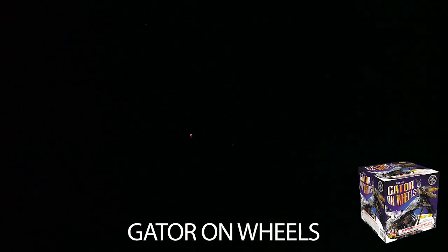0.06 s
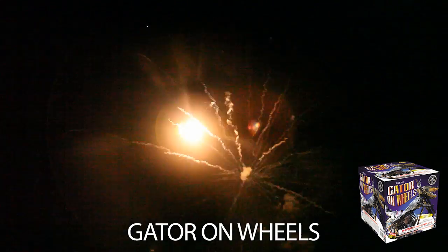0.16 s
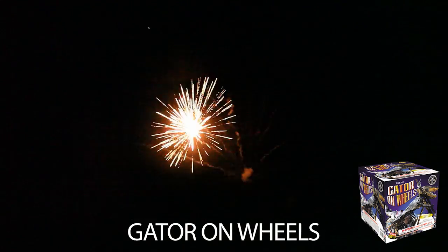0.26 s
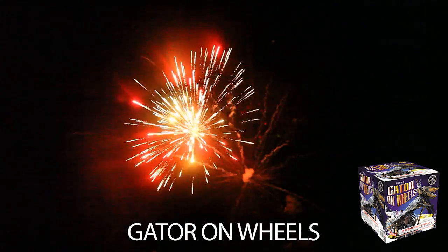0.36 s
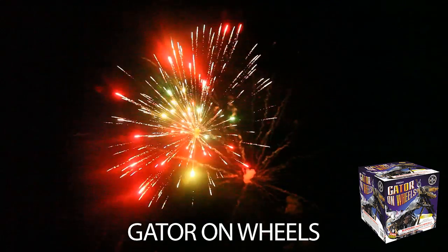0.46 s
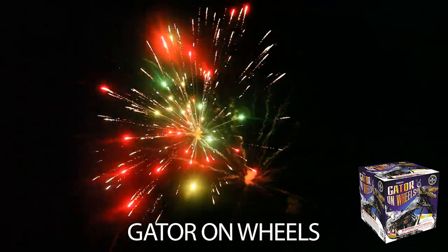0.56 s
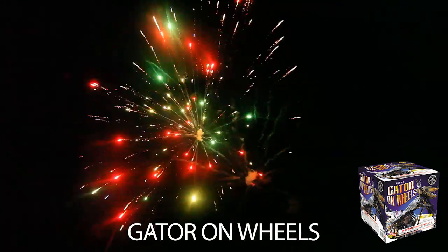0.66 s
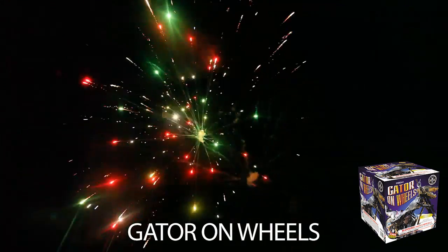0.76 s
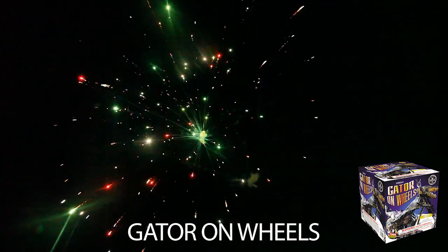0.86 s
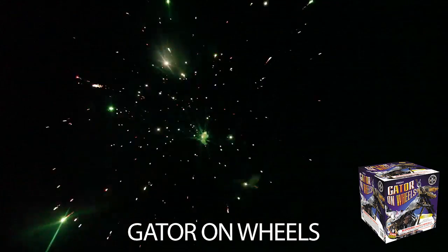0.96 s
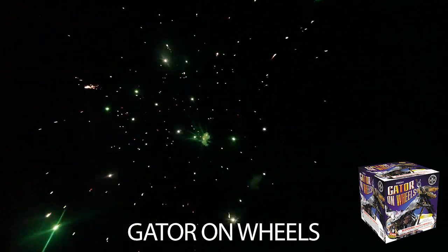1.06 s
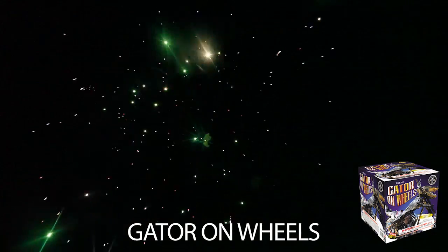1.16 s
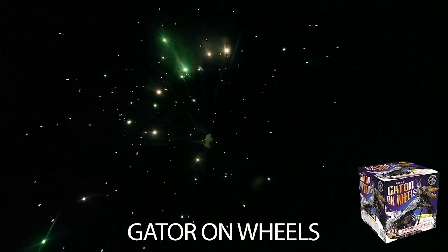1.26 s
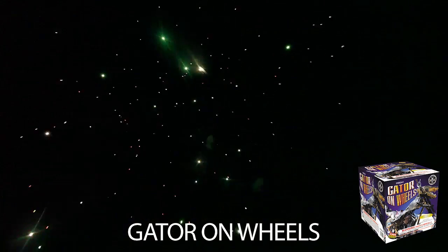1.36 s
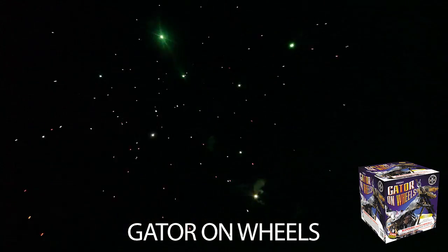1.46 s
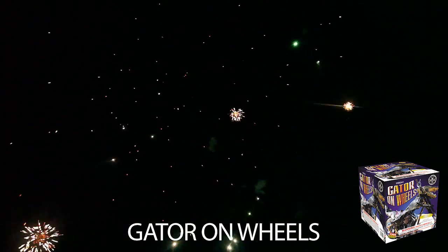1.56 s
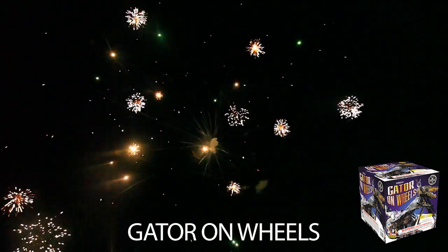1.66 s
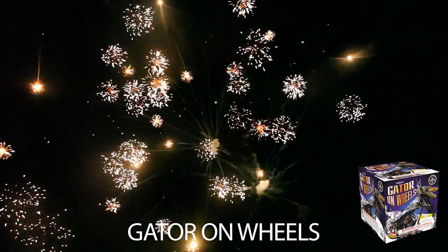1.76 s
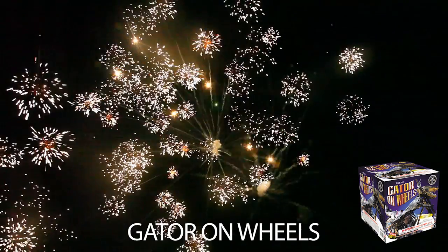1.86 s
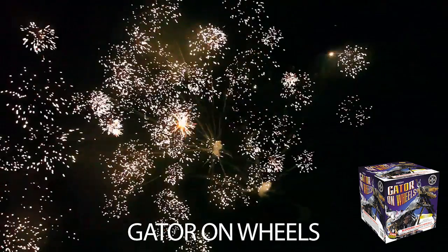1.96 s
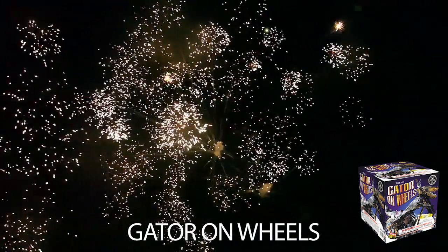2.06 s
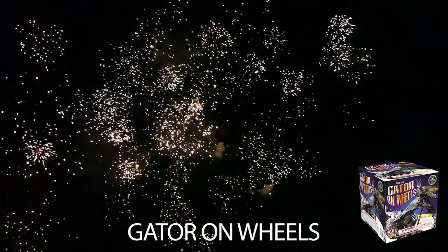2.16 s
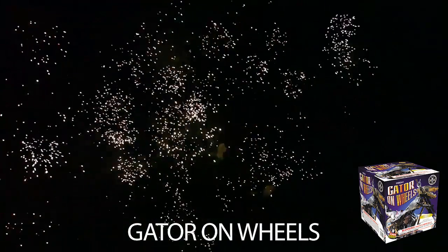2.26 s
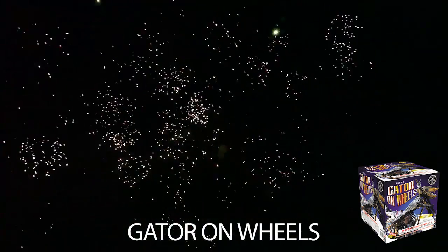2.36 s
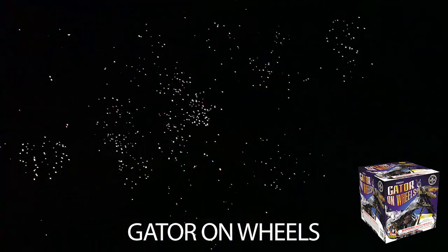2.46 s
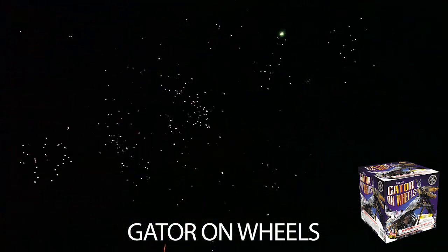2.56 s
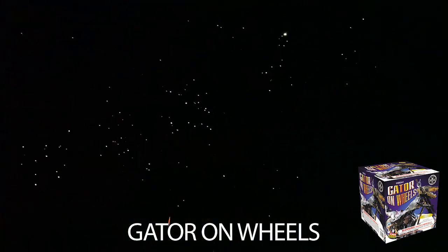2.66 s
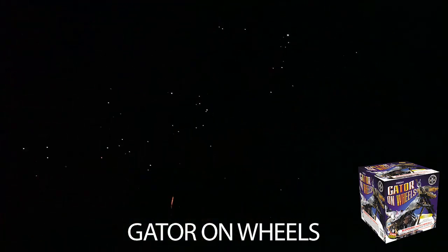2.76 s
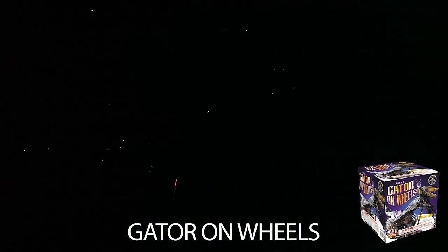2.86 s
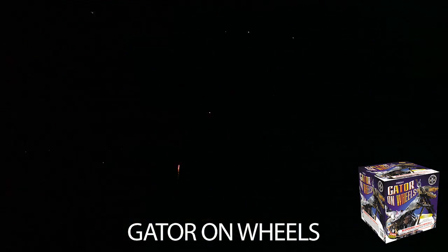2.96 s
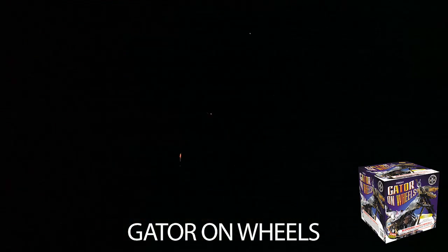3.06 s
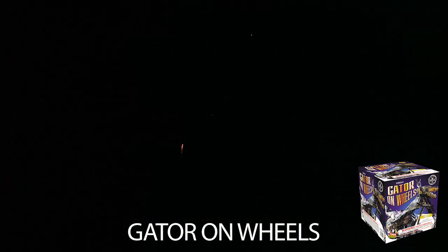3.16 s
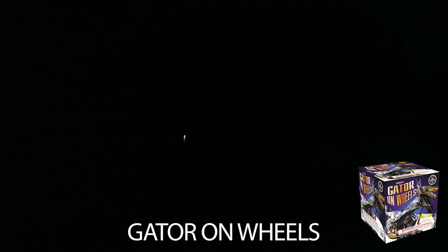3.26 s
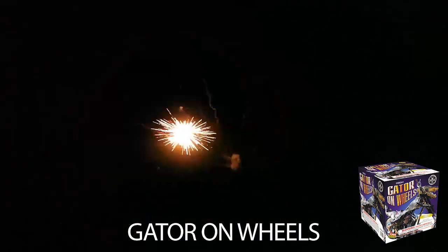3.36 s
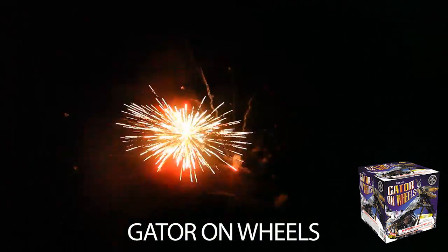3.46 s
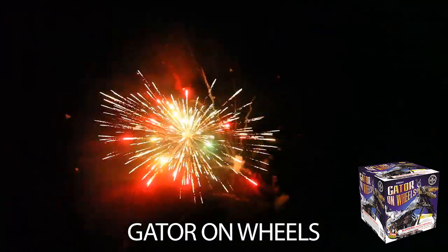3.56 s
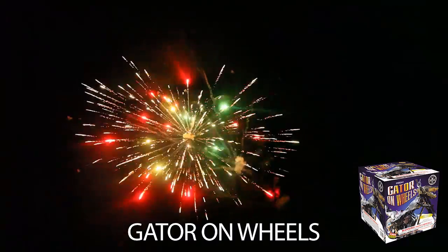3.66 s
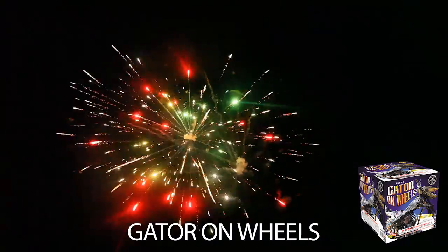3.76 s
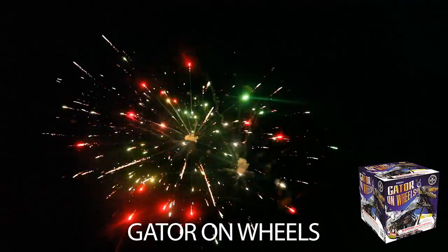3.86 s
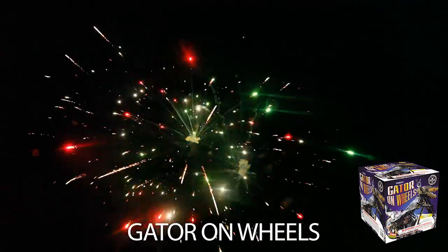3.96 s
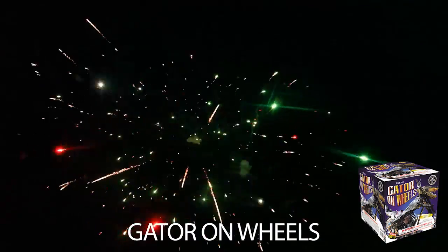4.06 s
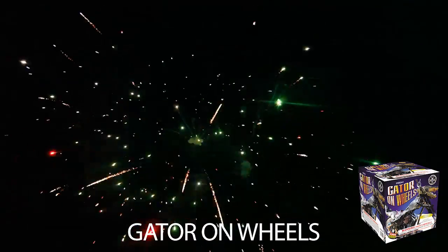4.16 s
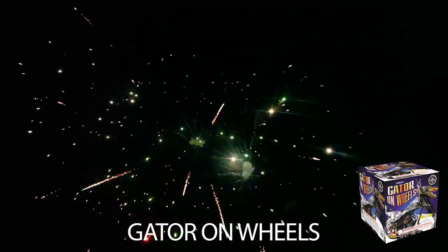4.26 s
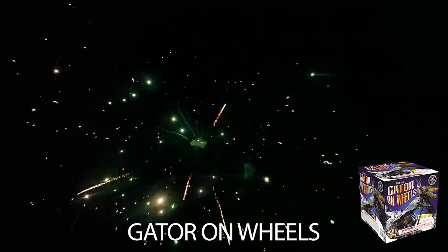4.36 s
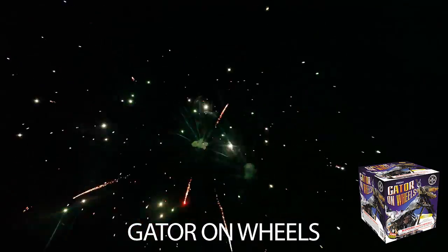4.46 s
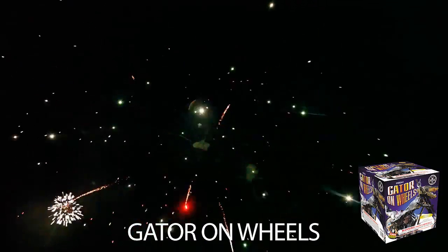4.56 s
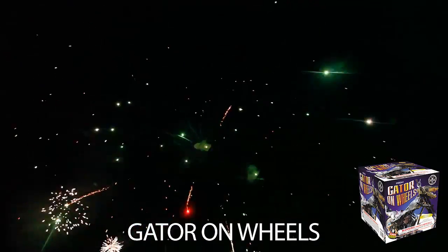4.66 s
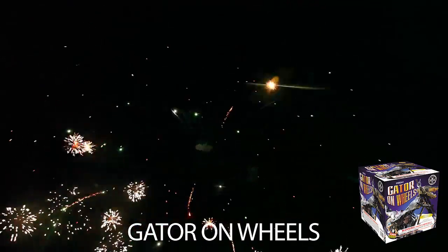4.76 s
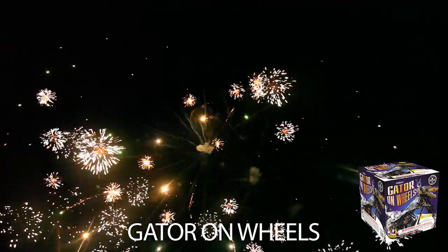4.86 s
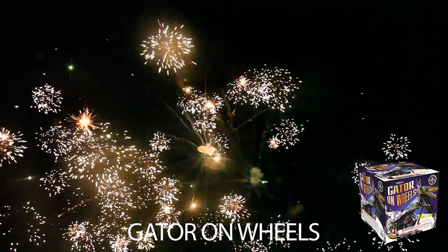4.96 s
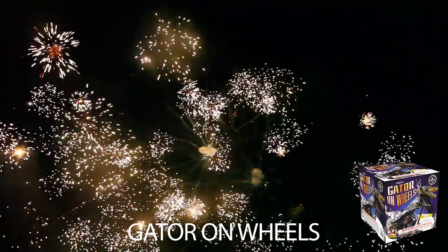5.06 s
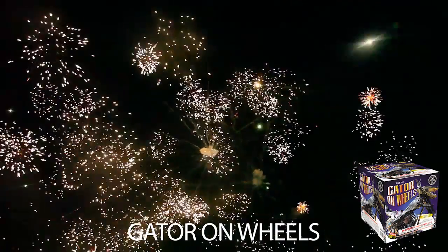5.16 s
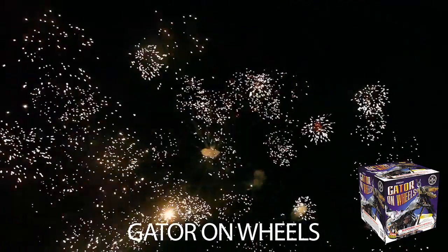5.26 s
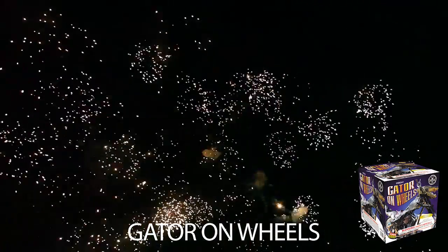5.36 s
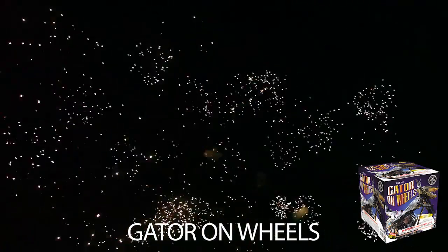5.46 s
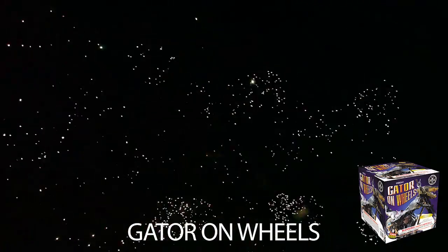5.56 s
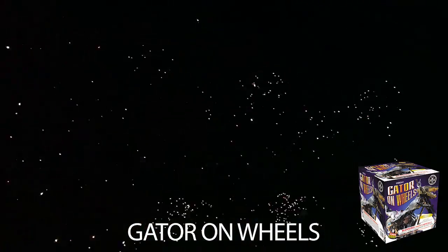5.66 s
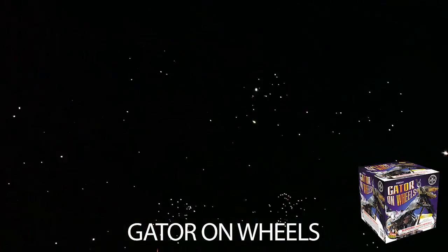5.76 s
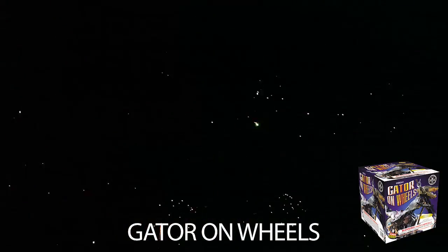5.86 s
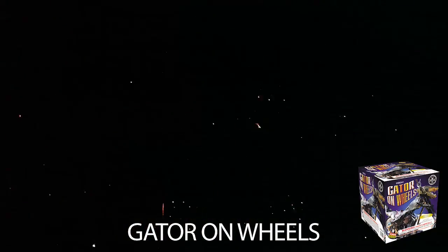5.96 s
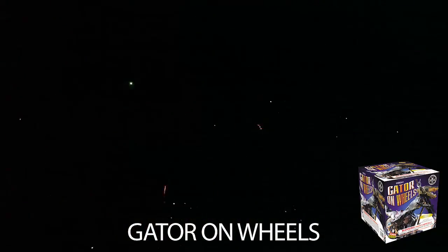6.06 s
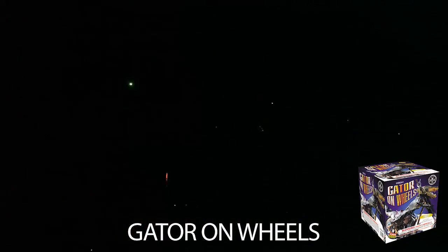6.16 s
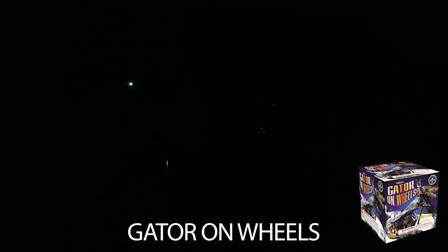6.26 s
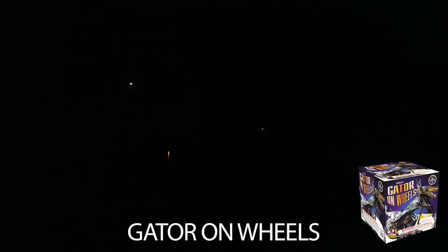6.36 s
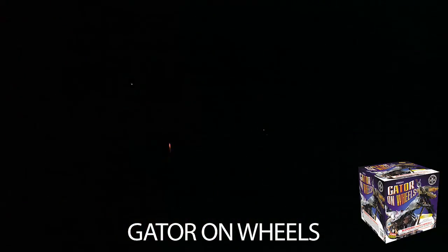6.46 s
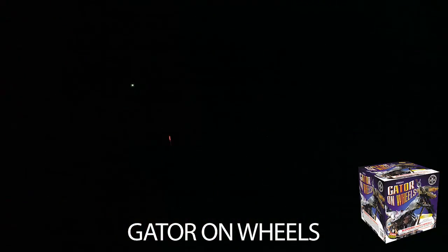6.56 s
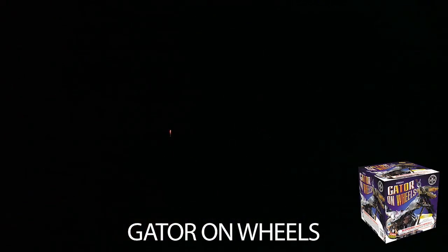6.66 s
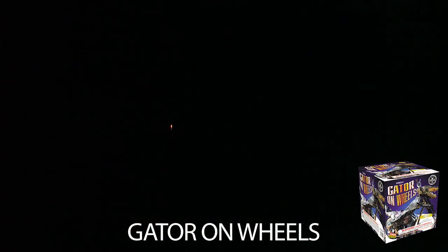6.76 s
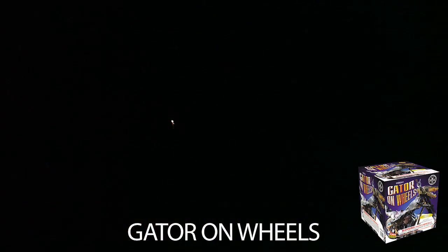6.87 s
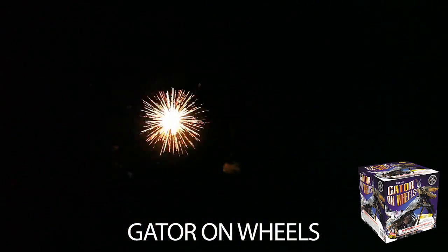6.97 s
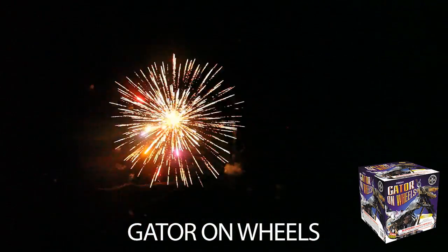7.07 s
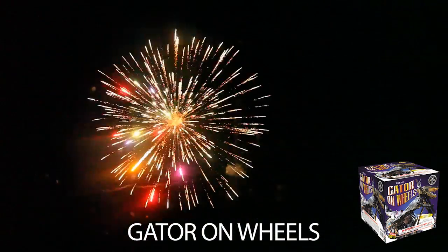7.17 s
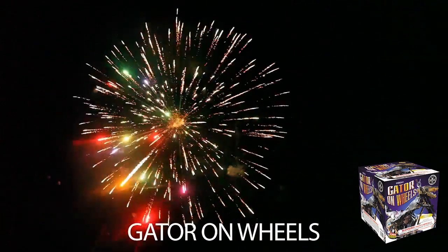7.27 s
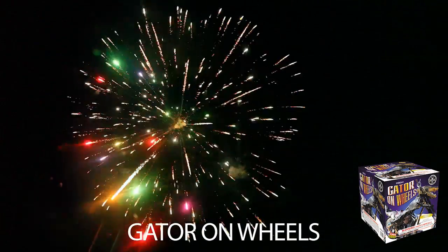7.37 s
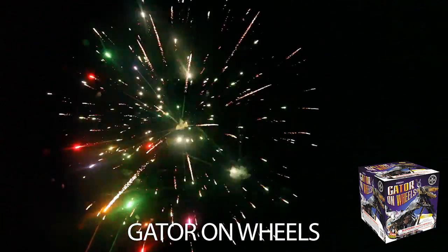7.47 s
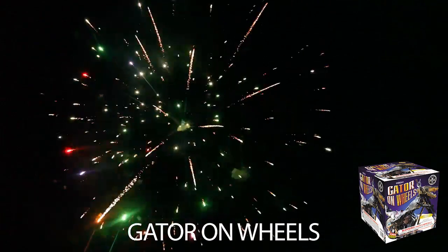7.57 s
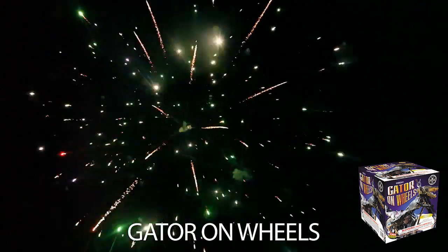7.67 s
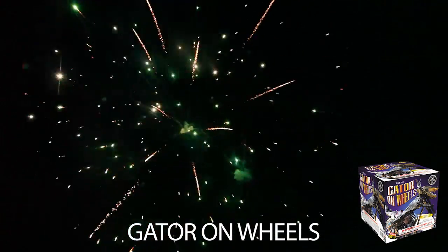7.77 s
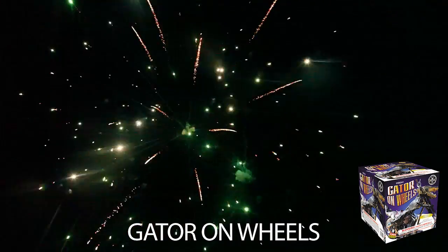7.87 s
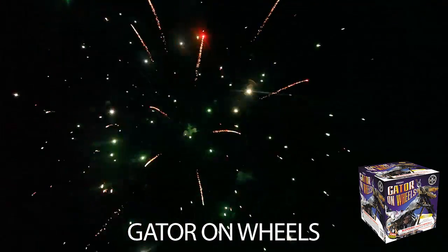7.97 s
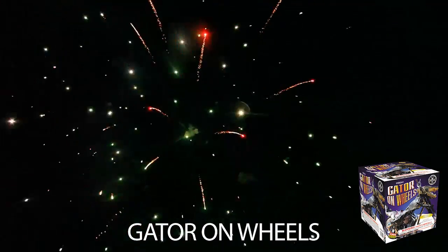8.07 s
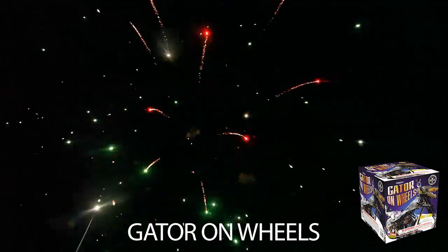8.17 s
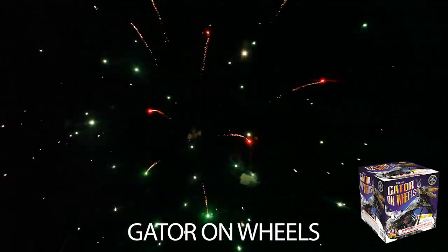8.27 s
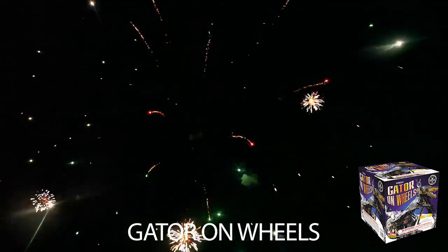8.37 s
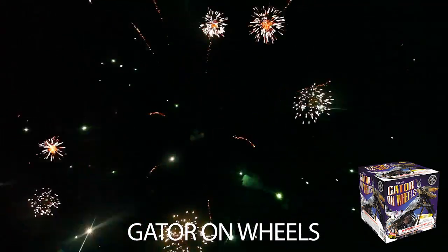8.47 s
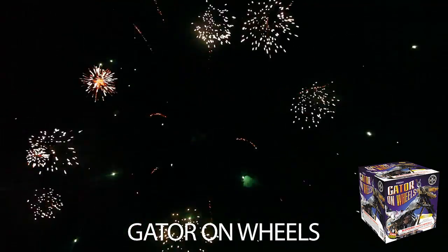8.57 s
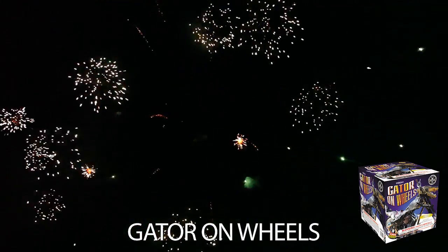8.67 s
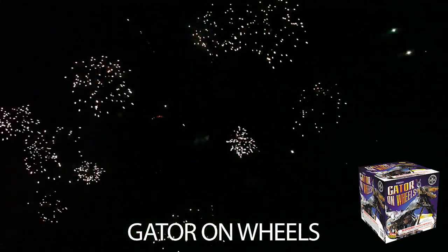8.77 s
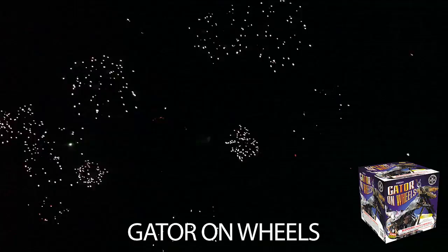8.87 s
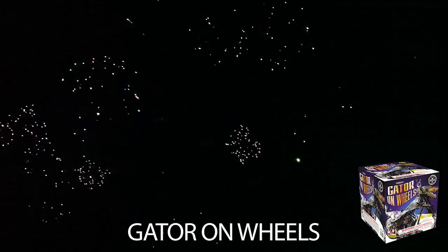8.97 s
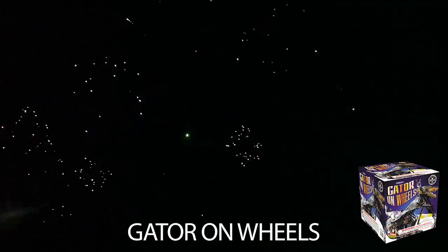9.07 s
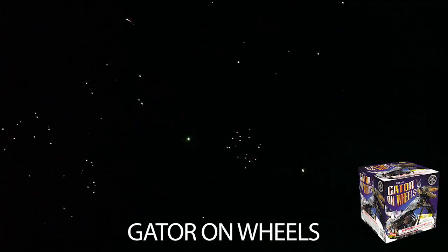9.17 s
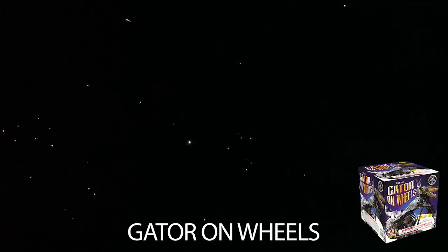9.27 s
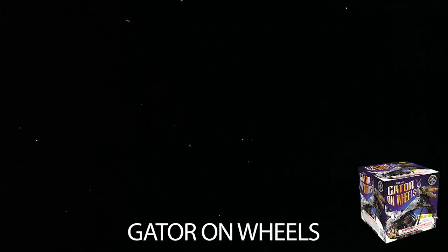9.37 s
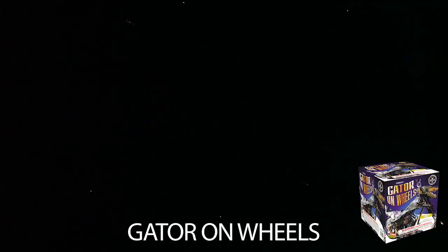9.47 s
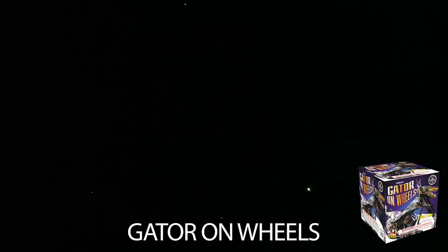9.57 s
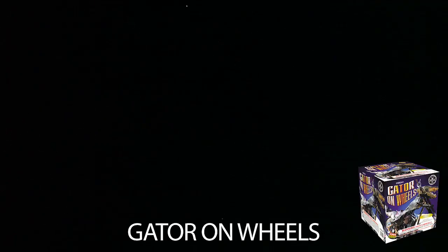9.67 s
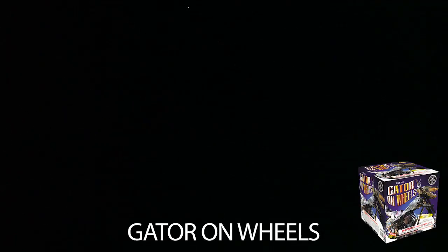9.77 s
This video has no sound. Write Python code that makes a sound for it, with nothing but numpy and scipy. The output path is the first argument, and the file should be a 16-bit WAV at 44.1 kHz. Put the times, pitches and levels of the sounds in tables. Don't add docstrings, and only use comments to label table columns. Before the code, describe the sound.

A hard, distorted firework bang cracks overhead, its ground bounce and low rumble fading into hushed night air with soft wind. Then tiny explosive snaps scatter and thicken into crackle, thinning to faint distant puffs, with a thud from the launch tube. The cycle repeats twice, the third crackle sparser, ending on a loud thump. The microphone clips, its gain ducks and slowly recovers.

```python
import sys
import numpy as np
from scipy import signal
from scipy.io import wavfile

SR = 44100
rng = np.random.default_rng(int(sys.argv[2]) if len(sys.argv) > 2 else 0)


def dump(signal):
    limited = np.clip(np.atleast_2d(signal).T, -1, 1)
    pcm = np.round(limited * 32767).astype(np.int16)
    wavfile.write(sys.argv[1], SR, pcm)


def ratio(d):
    e = np.asarray(d, float) / 20
    return 10 ** e


N = 433499

# t/s, ceiling level/dB, ring f/Hz, ground bounce delay/ms
SHELL_BURSTS = [
    (.3571, .6, 400, 5.45),
    (3.5026, .6, 415, 5.5),
    (7.1087, .6, 398, 5.8),
]
# t/s, ceiling level/dB, ring f/Hz, ground bounce delay/ms
LIFT_THUMPS = [
    (2.2720, -6.8, 330, 8.4),
    (5.4412, -6.5, 310, 8.5),
    (9.4866, -.1, 310, 8.5),
]
# f/Hz, level/dB per Hz, time to fall 60 dB/s
SHELL_ROLL = [(60, -7.5, 0.11), (190, -0.5, 0.23), (400, 4, 0.17), (815, -10.5, 0.18), (2000, -16, 0.14),
              (5500, -27, .12), (8900, -38.5, 0.033), (15000, -38, 0.083)]
LIFT_ROLL = [(60.23, -7.5, 0.099), (190, 0, 0.14), (374, -5.5, 0.21), (785, 3, 0.041), (2070, -14, 0.043),
             (5350, -21, 0.055), (8900, -42, 0.036), (14200, -63, 0.033)]
# f/Hz, level/dB per Hz, time to fall 60 dB/s
SHELL_LATE = [(60, -16.5, 0.28), (188, -3, 1.7), (370, 3, 0.83), (610, -4.5, 0.72), (3800, -21.5, 1.4),
              (5500, -21.5, .8), (7200, -30.5, 0.87), (15000, -42, 0.18)]
LIFT_LATE = [(60, -16.5, 0.44), (202, -3.5, 0.27), (354, -1, 1.1), (516.5, -23, 0.8), (899, -16.5, .5),
             (1930, -24, 0.32), (5430, -34.5, 0.77), (14700, -63, .2)]

# t/s, strength level/dB over full scale, ground bounce delay/ms, push width/ms
EARLY_STARS = [(1.6693, 4.6, 3.7, .125), (1.7702, 9, 3.4, .1), (1.7975, -4, 5.7, .11),
               (1.8032, -.4, 6, .13), (1.811, -2.3, 3.8, .115), (1.8148, -4.2, 4, .13),
               (1.8352, -9.3, 5.9, .115), (1.8411, -4.9, 5.1, .115), (1.8799, -6.2, 4.9, .115),
               (2.2862, -8, 5, .12), (2.3353, -7.2, 4.8, .125), (2.3771, -7.1, 5, .125),
               (4.5993, 3.2, 3.4, .13), (4.6832, -.5, 4.1, .115), (4.8282, 6.5, 3.5, .105),
               (4.8772, 6.5, 3.2, .13), (4.9129, -3.9, 5.7, .135), (4.9295, -5.8, 4.9, .115),
               (4.9791, -7.6, 3.5, .115), (5.3017, -6.6, 4, .115), (5.4125, -8.2, 4, .115),
               (5.4618, -6, 4.3, .13), (5.5323, -8.3, 3.6, .115), (5.6579, -4.9, 4.3, .125)]
LAST_STARS = [(8.4633, 5.5, 4, .15), (8.4815, -18, 1.5, .15), (8.5147, 0, 5.4, .15),
              (8.5336, -5.2, 4.1, .11), (8.5441, -2.8, 6.1, .15), (8.5851, -3.7, 6.5, .125),
              (8.5976, -5.9, 6.8, .115), (8.6044, -5.6, 4.7, .115), (8.6681, -6, 5.6, .135),
              (8.7604, -6.4, 5, .115), (8.7993, -6.6, 4.7, .115), (8.8579, -6.4, 5.5, .115),
              (8.8763, -6.3, 5.9, .16), (8.9169, -6.1, 4.6, .115)]
# first t/s, last t/s, number of stars
FIRST_FLURRIES = [(1.8564, 1.8627, 2), (1.8875, 1.893, 5), (1.8998, 1.9041, 4), (1.9093, 1.9159, 4),
                  (1.9238, 1.9278, 2), (1.9357, 1.9383, 3), (1.943, 1.9495, 2), (1.9542, 1.9623, 5),
                  (1.9763, 1.9851, 3), (1.9888, 1.9956, 4), (2.0042, 2.0158, 2), (2.0189, 2.0355, 2),
                  (2.0418, 2.0534, 2), (2.0597, 2.0686, 6), (2.0758, 2.0838, 2), (2.0983, 2.1091, 2),
                  (2.1162, 2.135, 7), (2.1785, 2.1827, 2), (2.2023, 2.2101, 2), (2.2595, 2.2668, 2),
                  (2.315, 2.3168, 2)]
SECOND_FLURRIES = [(4.939, 4.9421, 2), (4.9547, 4.9662, 2), (4.9948, 5.0032, 2), (5.0059, 5.0088, 2),
                   (5.0166, 5.0213, 4), (5.0286, 5.0305, 2), (5.0447, 5.0478, 3), (5.0529, 5.0605, 3),
                   (5.0656, 5.0725, 5), (5.0765, 5.0802, 3), (5.087, 5.095, 3), (5.1127, 5.1185, 3),
                   (5.15, 5.1631, 5), (5.1676, 5.1751, 4), (5.1819, 5.1977, 4), (5.2076, 5.2192, 2),
                   (5.2315, 5.2438, 5), (5.2537, 5.2577, 2), (5.2794, 5.2867, 2), (5.3227, 5.3312, 3),
                   (5.3707, 5.3741, 2)]
# f/Hz, level/dB per Hz, time to fall 60 dB/s
POP_SCATTER = [(147, 9.5, 0.068), (674, -7, 0.12), (1473, -4, 0.082), (3500, -21, 0.058),
               (5430, -12.5, 0.1), (6730, -8.5, 0.042), (9100, -37, .03), (14900, -52, .02)]
# t/s, peak level/dB
FAR_POPS = [(2.564, -43), (2.638, -43), (2.737, -53.5), (2.831, -45), (2.855, -50), (2.88, -48),
            (2.906, -44), (2.961, -46.5), (3.008, -53), (5.795, -43.5), (5.857, -55), (5.927, -49),
            (5.971, -48), (6.03, -67), (6.153, -62), (6.213, -64), (9.059, -45), (9.194, -45),
            (9.241, -44.5), (9.32, -45)]

# t/s, level/dB
GUSTS = [(0.0, -70), (0.19, -60.5), (0.41, -60.5), (0.85, -65), (2.14, -57), (2.35, -69), (3.17, -65.5),
         (3.56, -56.5), (4.02, -68.5), (5.06, -57), (5.83, -71), (6.95, -59.5), (7.09, -55.5),
         (7.58, -71.5), (8.51, -57.5), (8.93, -72), (9.58, -63), (9.83, -71)]
# f/Hz, level/dB per Hz
WIND = [(20, -1), (50, 4), (90, -6), (160, -15.5), (300, -51)]
RUMBLE = [(50, -32.5), (90, -4.5), (170, 2), (330, -5.5), (480, -13), (700, -32.5)]
TREES = [(400, -16.5), (620, -8), (900, -0.2), (1250, -13), (1800, -34.5)]
HISS = [(700, -16), (1400, 0.5), (2500, -2.5), (4000, -7), (5500, -17), (6800, -19), (9000, -32.5),
        (16500, -40)]
NIGHT = [(100, 3), (400, -0.5), (2000, -3.5), (4500, -6), (6500, -17.5), (10000, -15.5), (16000, -19)]
# rest level/dB, level after a shell/dB, its fading/(dB/s),
# level after a star/dB, its fading/(dB/s)
RETURNS = [
    (-75, -46, 10.5, -55.5, 87),
    (-72, -53, 7.5, -66, 69),
    (-77.5, -47, 11.5, -51, 59),
]

NIGHT_DB = -71.5
DIP_PER_DB, ROLL_PER_DB = -.55, .6
FLURRY_DB, FLURRY_SPREAD_DB, UNEVEN = -6.7, 1.4, .3
BOUNCE_MS, BOUNCE_SPREAD_MS, BOUNCE_DB, REBOUND_DB = 4.6, .7, -9, -22
DIRECT_MS, BOUNCE_WIDENS, WIDTH_SPREAD_DB = .122, 1.2, 1.1
SETTLE_S, LINGER_DB, LINGER_DB_PER_S = .2, -17, 25
LIFT_RETURN_DB, LIFT_FADE_DB_PER_S = (-54.5, -60, -60.5), 26
CLIMB_DB, CLIMB_DB_PER_S = (-66.5, -66, -64.5), 55.5
MIC_PEAK_HZ, MIC_RATTLE_WIDTH_HZ, CAPSULE_WIDTH_HZ, CAPSULE_DB = 5270, 2700, 1100, -2.5

EDGES = 22 * 2 ** np.arange(0, 9.7, .3)
BANK = [(np.sqrt(low * high), signal.butter(2, [low, high], "band", fs=SR, output="sos"))
        for low, high in zip(EDGES, EDGES[1:])]


def rms_one(x):
    return x / np.sqrt(np.mean(x ** 2) + 1e-20)


def at_hz(points, hz, order=1):
    p = np.array(points)
    return np.interp(np.log(hz), np.log(p[:, 0]), p[:, order])


def drift(rate):
    r = np.exp(-80 * np.pi * rate / SR)
    white = rng.standard_normal(N // 40 + 2002)
    slow = rms_one(signal.lfilter([1], [1, -2 * r, r * r], white)[2000:])
    return np.interp(np.arange(N) / 40, np.arange(len(slow)), slow)


def bands(size):
    white = rng.standard_normal((2, size + 2000))
    for k, (hz, sos) in enumerate(BANK):
        yield hz, signal.sosfilt(sos, white[k % 2])[2000:]


def dying_noise(table, size):
    t = np.arange(size) / SR
    steady, dying = np.zeros(size), np.zeros(size)
    for hz, band in bands(size):
        sound = ratio(at_hz(table, hz)) * band
        fall_s = np.abs(at_hz(table, hz, order=2))
        steady += sound
        dying += sound * np.exp(-np.log(1000) * t / fall_s)
    return dying / np.std(steady)


def add(out, sound, s):
    i = round(s * SR)
    out[i:i + len(sound)] += sound[:N - i]


def mic_resonance(x, width_hz):
    return signal.lfilter(*signal.iirpeak(MIC_PEAK_HZ, MIC_PEAK_HZ / width_hz, fs=SR), x)


def capsule(x):
    return x + ratio(CAPSULE_DB) * mic_resonance(x, CAPSULE_WIDTH_HZ)


def fading(since, db_per_s, rise_s):
    t = np.maximum(since, 0)
    return (since > 0) * ratio(-2 * db_per_s * t) * (1 - np.exp(-t / rise_s))


def returns(pops):
    t = np.arange(0, N / SR + .01, .005)
    shells, lifts, popped = (t - np.array(rows)[:, :1] for rows in (SHELL_BURSTS, LIFT_THUMPS, pops))
    star_power, quick_s = ratio(2 * pops[:, 1]), .002
    linger = ratio(2 * LINGER_DB) * star_power @ fading(popped, LINGER_DB_PER_S, SETTLE_S)
    climb = fading(-shells, CLIMB_DB_PER_S, quick_s).sum(axis=0)
    lift = fading(lifts, LIFT_FADE_DB_PER_S, SETTLE_S).sum(axis=0)
    for row, lift_db, climb_db in zip(RETURNS, LIFT_RETURN_DB, CLIMB_DB):
        rest_db, shell_db, shell_fade, star_db, star_fade = row
        shell = fading(shells, shell_fade, SETTLE_S).sum(axis=0)
        star = star_power @ fading(popped, star_fade, quick_s) + linger
        power = ratio(2 * rest_db) + ratio(2 * shell_db) * shell + ratio(2 * climb_db) * climb
        power += ratio(2 * lift_db) * lift + ratio(2 * star_db) * star
        yield t, 10 * np.log10(power)


def surroundings(pops, lumpy_db=(2.5, 2.5, 2.5, .6), lumps_per_s=(4, 9, 12, 15)):
    levels = [np.transpose(GUSTS), *returns(pops)]
    spectra, layers = (WIND, RUMBLE, TREES, HISS, NIGHT), np.zeros((5, N))
    for hz, band in bands(N):
        for layer, spectrum in zip(layers, spectra):
            if spectrum[0][0] < hz < spectrum[-1][0]:
                layer += band * ratio(at_hz(spectrum, hz))
    out = np.zeros(N)
    for layer, (s, level_db), depth_db, rate in zip(layers, levels, lumpy_db, lumps_per_s):
        level = np.interp(np.arange(N) / SR, s, level_db)
        out += rms_one(layer) * ratio(level + depth_db * drift(rate))
    return capsule(out) + ratio(NIGHT_DB) * rms_one(layers[4])


def gas_swing(t, hz, lead_ms, ring_ms, slows_ms, edge_ms):
    ms = np.maximum(t, 0) * 1000
    turn = 2 * np.pi * hz / 1000 * (lead_ms - ms / (1 + ms / slows_ms))
    return (1 - np.exp(-ms / edge_ms)) * np.sin(turn) * np.exp(-ms / ring_ms)


def blasts(rows, roll, lead_ms, ring_ms, slows_ms, edge_ms, rise_ms, hold_ms, dip_ms, back_ms,
           chatter_db, chatter_ms, roll_db, over_db, bounce_db, duck_db):
    out, t = np.zeros(N), np.arange(SR // 3) / SR
    ms = t * 1000
    for s, top_db, hz, lag_ms in rows:
        dip_db = duck_db + DIP_PER_DB * top_db
        direct = gas_swing(t, hz, lead_ms, ring_ms, slows_ms, edge_ms)
        bounce = gas_swing(t - lag_ms / 1000, hz, lead_ms, ring_ms, 1.45 * slows_ms, edge_ms)
        shock = direct + ratio(bounce_db) * bounce
        scatter_db = roll_db + (ROLL_PER_DB - 1.5) * top_db - dip_db
        scattered = ratio(scatter_db) * capsule(dying_noise(roll, len(t))) * (1 - np.exp(-ms / rise_ms))
        rattle = mic_resonance(rng.standard_normal(len(t)), MIC_RATTLE_WIDTH_HZ)
        chatter = ratio(chatter_db) * rms_one(rattle) * np.exp(-ms / chatter_ms)
        late = np.maximum(ms - hold_ms, 0)
        gain_db = top_db + dip_db * (1 - np.exp(-late / dip_ms)) * np.exp(-late / back_ms)
        flat_topped = np.clip(ratio(over_db) * shock + chatter + scattered, -1, 1)
        add(out, ratio(gain_db) * flat_topped, s)
    return out


def shell_bursts():
    return blasts(SHELL_BURSTS, SHELL_ROLL, lead_ms=.47, ring_ms=2.8, slows_ms=6.4, edge_ms=.02,
                  rise_ms=5, hold_ms=7.5, dip_ms=.73, back_ms=980, chatter_db=-3.5, chatter_ms=10,
                  roll_db=-5.5, over_db=23, bounce_db=-1.5, duck_db=-6.2)


def late_roll(rows, roll, below_db, rise_ms, surge_db=3.5):
    out, t = np.zeros(N), np.arange(3 * SR // 2) / SR
    for s, top_db, *_ in rows:
        swell = 1 - np.exp(-t * 1000 / rise_ms)
        add(out, ratio(ROLL_PER_DB * top_db + below_db) * dying_noise(roll, len(t)) * swell, s)
    bass = signal.sosfilt(signal.butter(2, 450, "low", fs=SR, output="sos"), out + 1e-18)
    return out + bass * (ratio(surge_db * drift(20)) - 1)


def stars():
    rows = EARLY_STARS + LAST_STARS
    for first, last, count in FIRST_FLURRIES + SECOND_FLURRIES:
        shift, size, lag, wide = rng.standard_normal((count, 4)).T
        order = np.arange(count)
        inner = order % (count - 1) > 0
        place = order + UNEVEN * np.clip(shift, -1, 1) * inner
        times = first + place * (last - first) / (count - 1)
        strengths = FLURRY_DB - FLURRY_SPREAD_DB * np.abs(size)
        lags = BOUNCE_MS + BOUNCE_SPREAD_MS * lag
        widths = DIRECT_MS * ratio(WIDTH_SPREAD_DB * wide)
        rows = rows + list(zip(times, strengths, lags, widths))
    s, db, lag_ms, width_ms = np.transpose(rows)
    soft = rng.standard_normal((len(s), 2)).T
    arrivals = ((0, 0, 1), (1, BOUNCE_DB + soft[0], BOUNCE_WIDENS), (2, REBOUND_DB + 2 * soft[1], 1))
    pops = []
    for k, loss_db, widens in arrivals:
        peak_db = np.minimum(db + loss_db, 0)
        pops.append(np.transpose([s + k * lag_ms / 1000, peak_db, widens * width_ms, k > 0 * s]))
    return np.concatenate(pops)


def crackle(pops, ripple_hz=5300, scatter_db=-21, lumps_db=5.5, thin_hz=190, pull=.34, pull_widths=5.5,
            ripple=.15, edge_ms=.01, ground_ms=.024):
    out, clicks, t = np.zeros(N), np.zeros(N), np.arange(160) / SR * 1000
    vary = rng.standard_normal((len(pops), 4))
    for (s, peak_db, width_ms, bounced), (deep, tone, ringing, soft) in zip(pops, vary):
        w = width_ms * 1.5
        push = np.minimum(1.3 * np.sin(np.pi * np.minimum(t / w, 1)), 1)
        u = np.maximum(t - w, 0)
        depth = pull * (1 + .6 * (peak_db > -3)) * ratio(1.5 * deep)
        suck = depth * np.sin(np.pi * np.minimum(u / (pull_widths * width_ms), 1) ** .45)
        wave = np.sin(2 * np.pi * ripple_hz * (1 + .05 * tone) * u / 1000)
        wobble = ripple * ratio(3 * ringing) * wave * np.exp(-u / .5)
        blur_db = 7 * np.clip(soft, -1.5, 1) - 1.3 * np.clip(peak_db + 6, -4, 6)
        r = np.exp(-1000 / SR / (edge_ms * ratio(blur_db) + ground_ms * bounced))
        pulse = signal.lfilter([(1 - r) ** 2], [1, -2 * r, r * r], push - suck - wobble)
        add(out, ratio(peak_db) * pulse / pulse.max(), s - w / 2000)
        clicks[round(s * SR)] += ratio(peak_db) * bounced
    lumps = ratio(scatter_db + lumps_db * drift(120))
    scatter = signal.fftconvolve(clicks, dying_noise(POP_SCATTER, SR // 4))[:N]
    out += capsule(lumps * scatter)
    return signal.sosfilt(signal.butter(2, thin_hz, "high", fs=SR, output="sos"), out + 1e-18)


def lift_thumps():
    return blasts(LIFT_THUMPS, LIFT_ROLL, lead_ms=.78, ring_ms=2.3, slows_ms=200, edge_ms=.12,
                  rise_ms=3, hold_ms=3.5, dip_ms=1.6, back_ms=1900, chatter_db=-28, chatter_ms=10,
                  roll_db=-5, over_db=13.5, bounce_db=-4, duck_db=-5.6)


def far_pops(smear_ms=4.5, low_hz=450, high_hz=4500, level_db=-1.5):
    out, t = np.zeros(N), np.arange(1500) / SR * 1000
    for (s, peak_db), noise in zip(FAR_POPS, rng.standard_normal((len(FAR_POPS), 1500))):
        add(out, ratio(peak_db + level_db) * noise * np.exp(-t / smear_ms), s)
    return signal.sosfilt(signal.butter(2, [low_hz, high_hz], "band", fs=SR, output="sos"), out + 1e-18)


def lift_echo(lag_s=.75, spread_s=.09, low_hz=550, high_hz=1100, level_db=-62):
    t = np.arange(N) / SR
    swell = sum(np.exp(-((t - s - lag_s) / spread_s) ** 2) for s, *_ in LIFT_THUMPS)
    sos = signal.butter(3, [low_hz, high_hz], "band", fs=SR, output="sos")
    noise = signal.sosfilt(sos, rng.standard_normal(N))
    return ratio(level_db + 5 * drift(25)) * swell * rms_one(noise)


def scene():
    pops = stars()
    bangs = shell_bursts() + lift_thumps()
    rolls = late_roll(SHELL_BURSTS, SHELL_LATE, below_db=-22.5, rise_ms=19)
    rolls += late_roll(LIFT_THUMPS, LIFT_LATE, below_db=-35, rise_ms=14)
    mix = bangs + crackle(pops) + far_pops() + lift_echo() + capsule(rolls) + surroundings(pops)
    return mix[None]


def band_limit(x):
    return signal.sosfilt(signal.butter(12, 16490, fs=SR, output="sos"), x)


def record(dry):
    x = signal.sosfilt(signal.butter(1, 22, "high", fs=SR, output="sos"), dry)
    x = signal.sosfilt(signal.cheby2(10, 50, 16650, fs=SR, output="sos"), x)
    return band_limit(np.clip(x, -1, 1))


dry = scene()
out = record(dry)
dump(out)
```